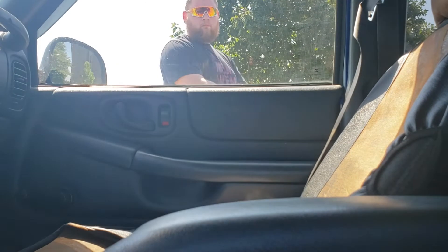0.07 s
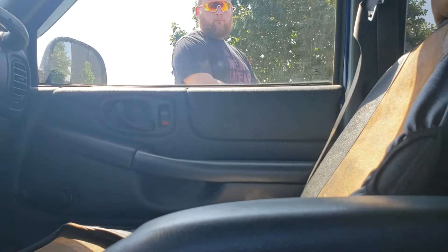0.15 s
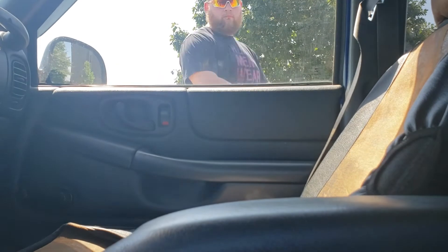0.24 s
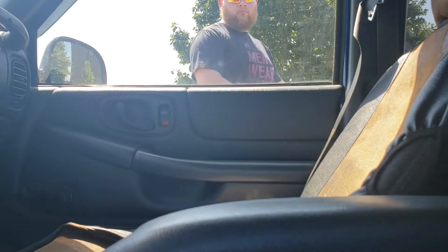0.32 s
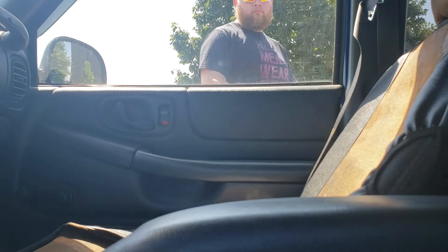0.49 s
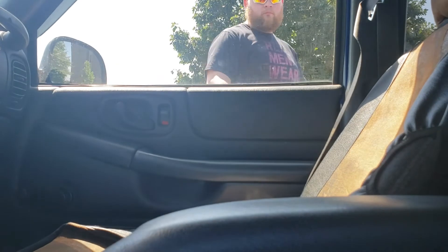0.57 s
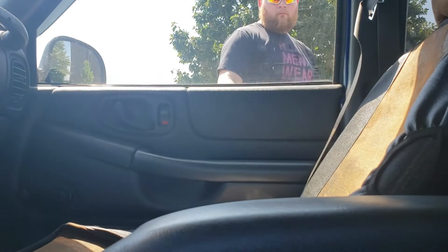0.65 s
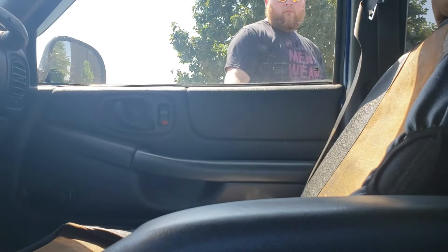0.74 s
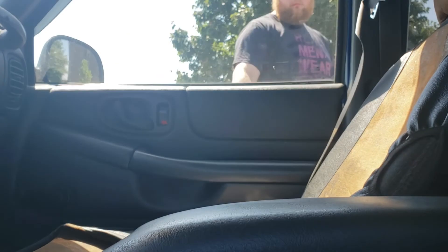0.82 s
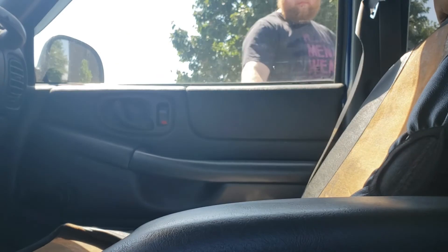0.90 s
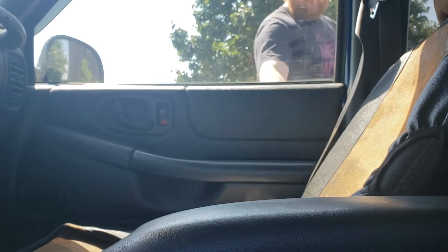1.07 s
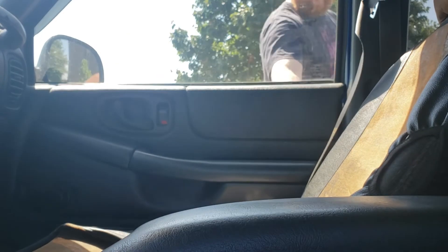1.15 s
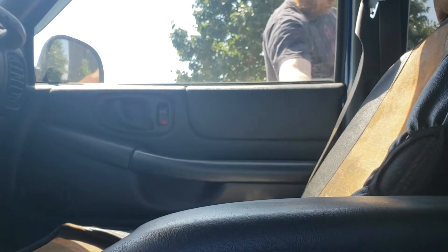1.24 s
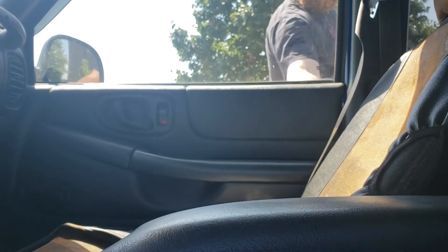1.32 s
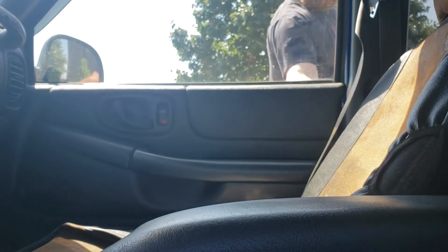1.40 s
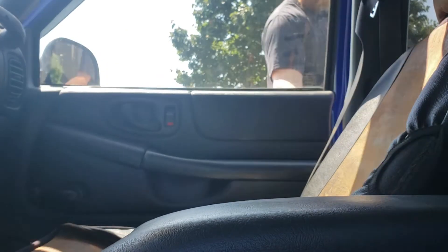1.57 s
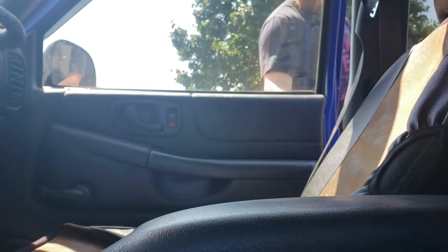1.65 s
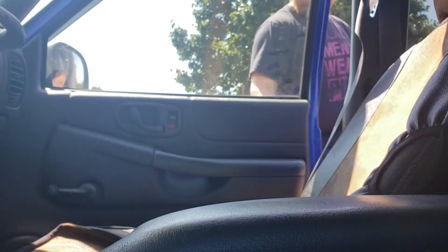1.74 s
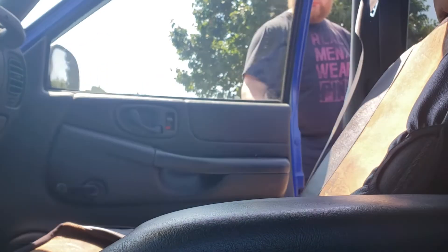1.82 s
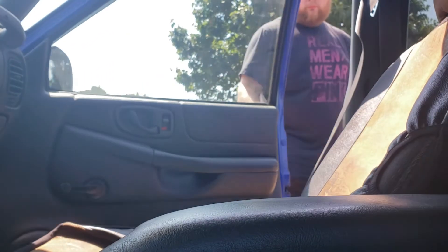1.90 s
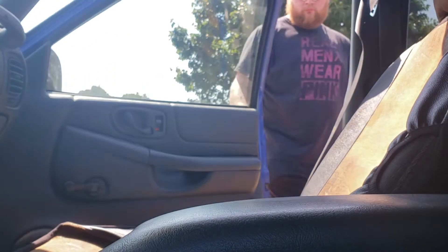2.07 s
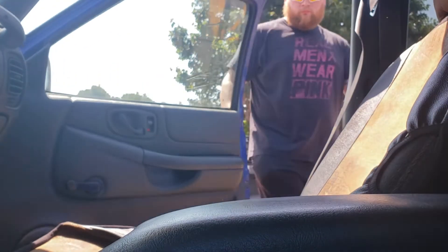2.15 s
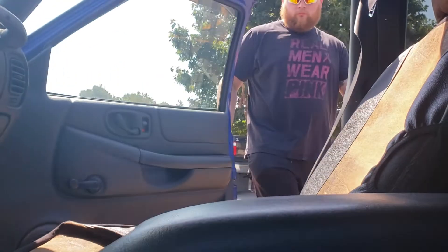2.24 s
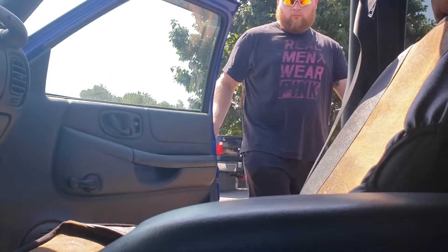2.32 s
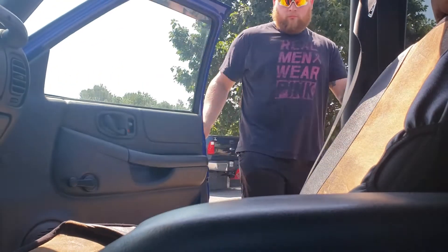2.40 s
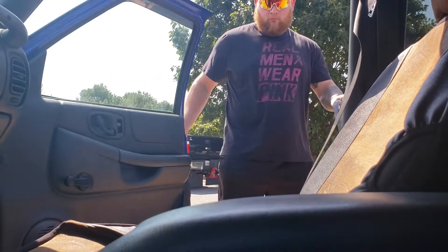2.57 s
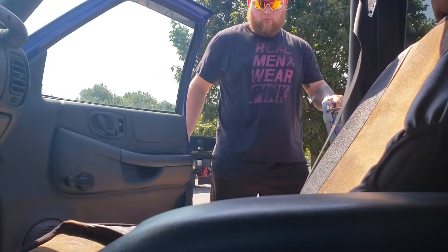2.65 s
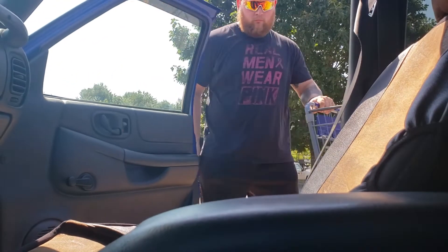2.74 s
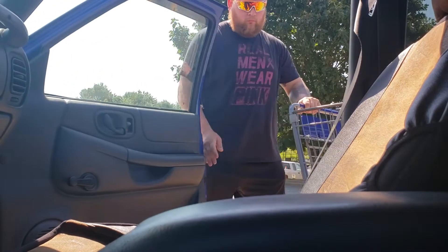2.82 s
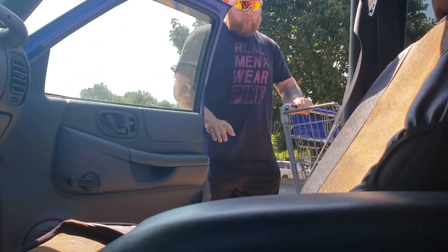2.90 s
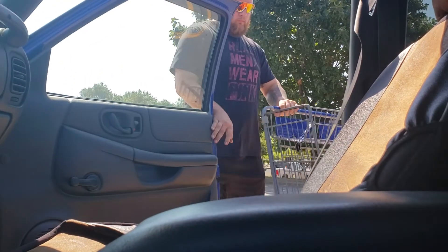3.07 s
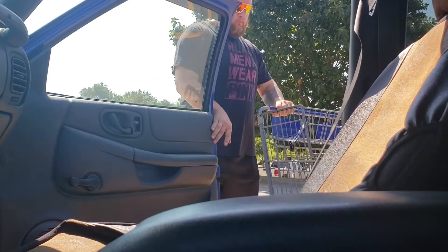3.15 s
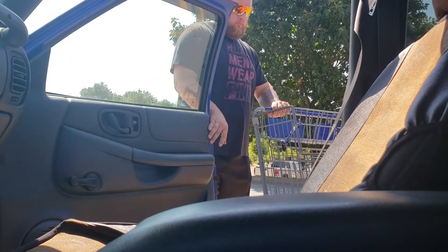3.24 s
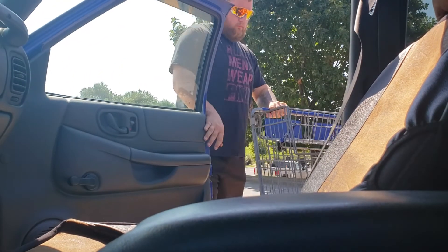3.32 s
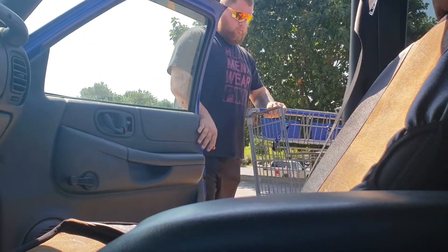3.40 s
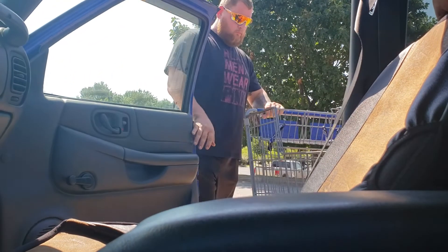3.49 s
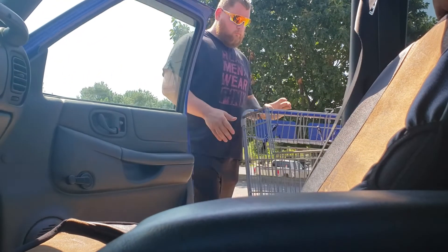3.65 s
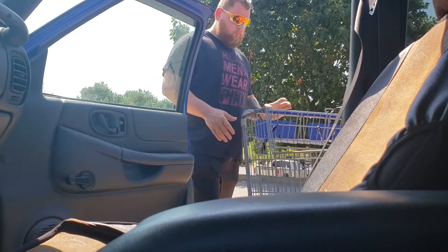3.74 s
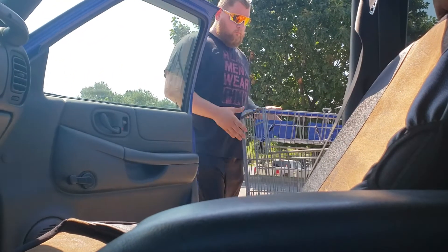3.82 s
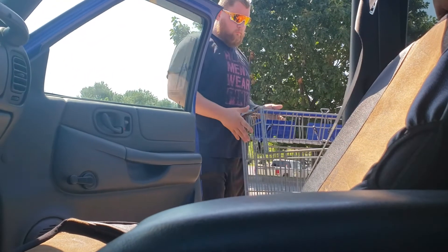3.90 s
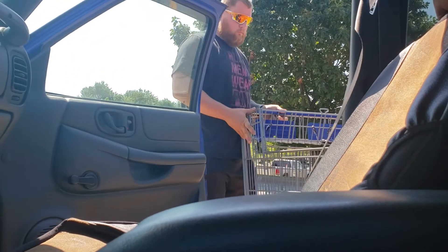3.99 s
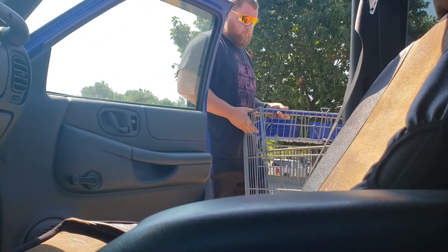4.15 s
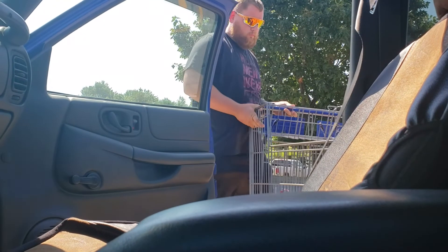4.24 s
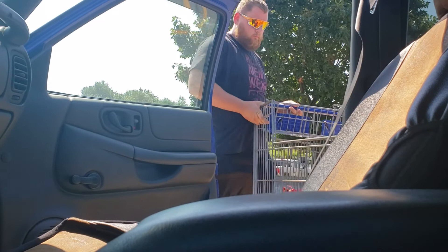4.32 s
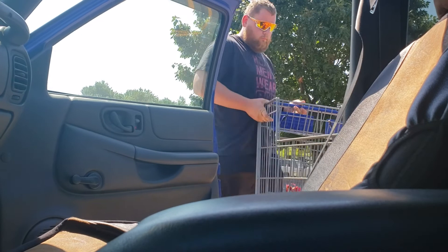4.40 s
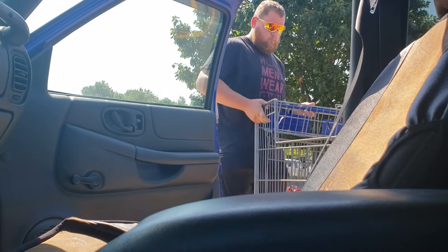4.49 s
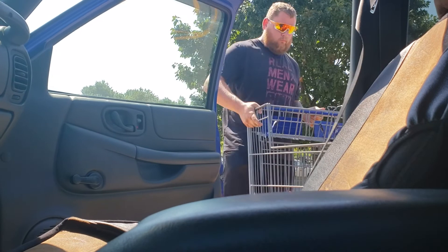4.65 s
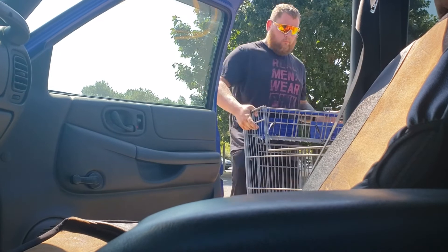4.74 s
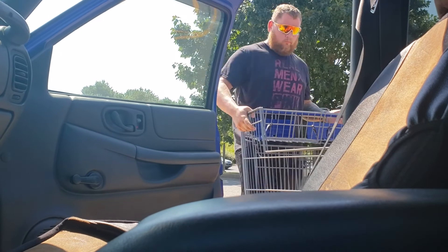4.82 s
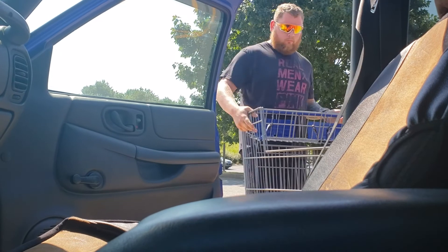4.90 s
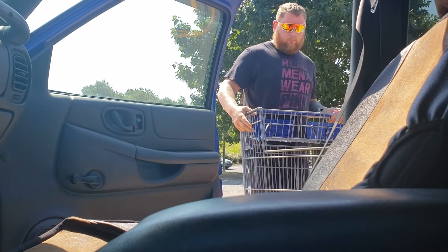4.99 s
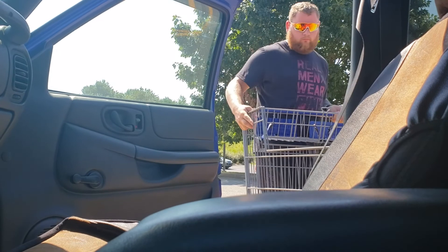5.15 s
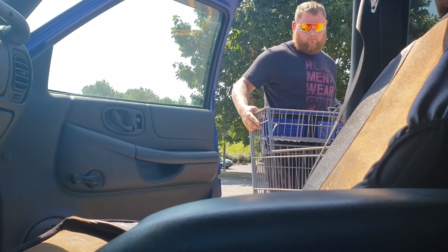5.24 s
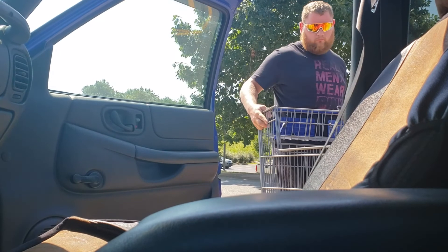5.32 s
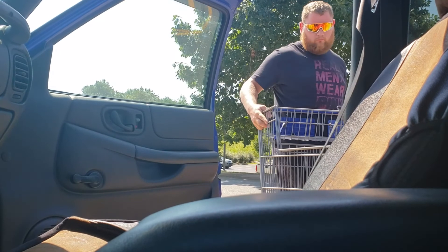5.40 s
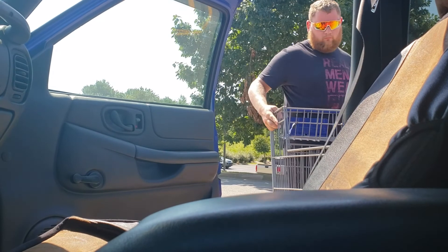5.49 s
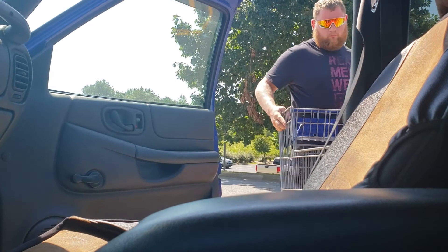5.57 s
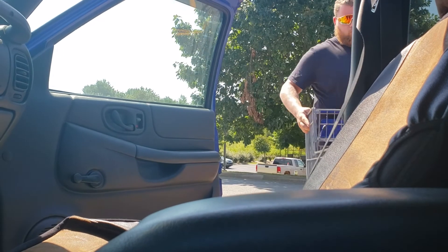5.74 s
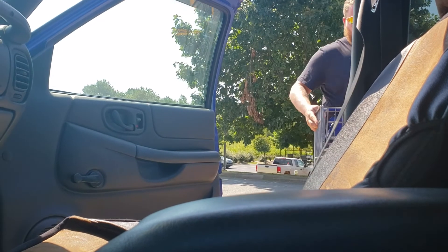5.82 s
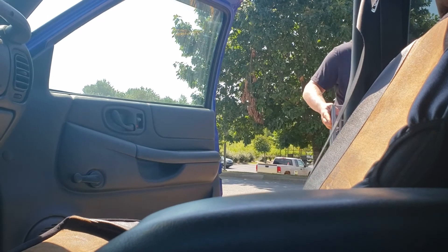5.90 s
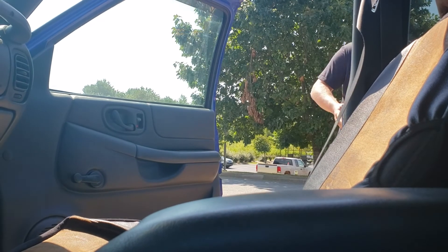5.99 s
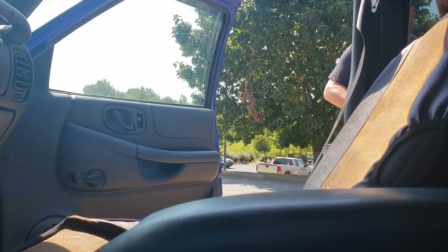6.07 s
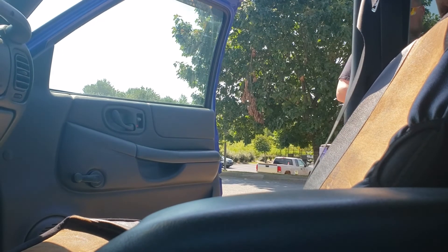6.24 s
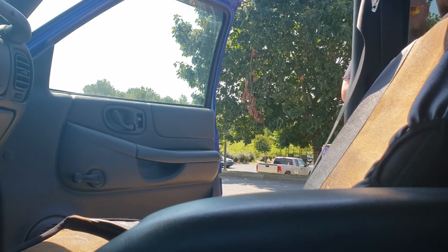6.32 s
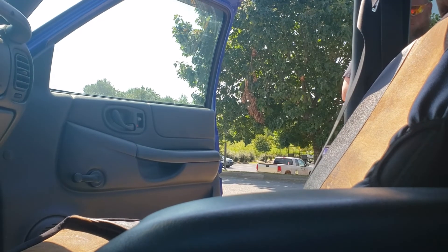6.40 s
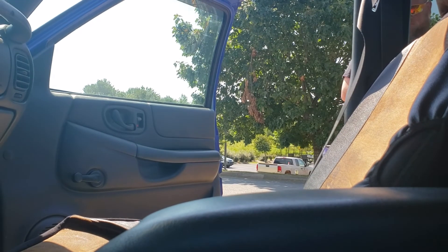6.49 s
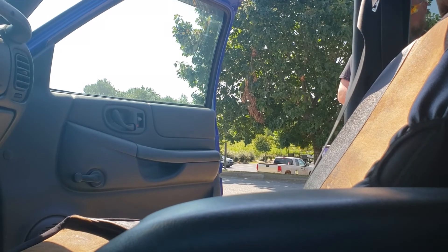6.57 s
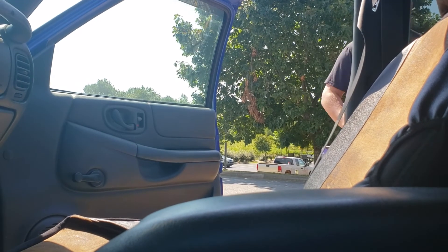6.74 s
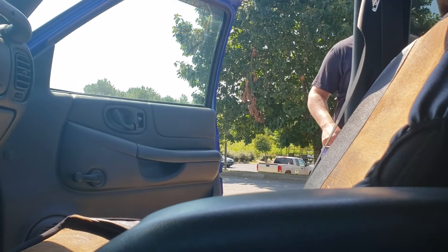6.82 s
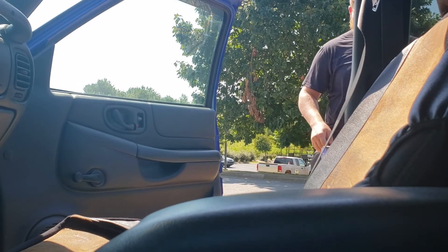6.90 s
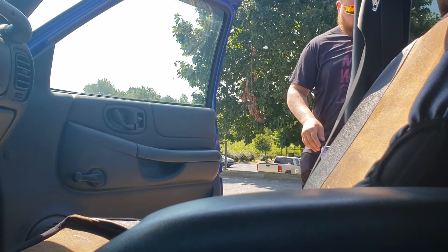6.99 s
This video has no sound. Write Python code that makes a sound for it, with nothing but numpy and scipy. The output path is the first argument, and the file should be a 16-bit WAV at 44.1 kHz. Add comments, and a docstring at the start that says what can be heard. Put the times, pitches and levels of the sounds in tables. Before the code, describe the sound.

A low, wavering engine rumble fills a truck cab. After a second the door pops open with a boomy thud and crisp metal clicks, followed by small knocks. The parking lot's faint wash enters. A cart is pushed in short bursts with hissing wheels, thin squeaks and jingling wires, ending in stronger rattles while the idle sinks slower. The stereo microphone sits inside, with short reflections from glass and trim.

```python
"""Inside a parked pickup with an unevenly idling engine: firing harmonics boom in the cab over a noisy shake.
The door is unlatched from outside with a thump and clicks: decaying modes, struck resonances and noise bursts.
It swings open and lets in the parking lot: coloured noise and the buzz of the engine bay.
A wire shopping cart is pushed in bursts: its wheels hiss, a caster squeaks, jolts rattle and ring the basket."""
import sys
import numpy as np
from scipy import signal
from scipy.fft import rfft, irfft
from scipy.io import wavfile
from scipy.ndimage import uniform_filter1d

SR = 44100
rng = np.random.default_rng(int(sys.argv[2]) if len(sys.argv) > 2 else 0)


def transcribe(u):
    """Save the signal u as a 16-bit wav file named by the first command-line argument.

    u: samples, shape (n,) or (channels, n), limited to [-1, 1]; the rate is SR.
    q: integer samples, one column per channel.
    """
    v = np.clip(np.atleast_2d(u).T, -1, 1)
    q = np.round(v * 32767).astype(np.int16)
    wavfile.write(sys.argv[1], SR, q)


N = 310976
T = np.arange(N) / SR

# In every table of resonances, width_hz is the bandwidth before ring() scales it by its damping.
# In every colour, level_db is the relative level per Hz.

# the idle hunts up and down: time_s, firing_rate_hz
IDLE_HUNT = [(0.0, 55.23), (0.3, 55.94), (0.82, 57.98), (1.05, 56.07), (1.28, 51.18), (1.6, 48.18),
             (1.82, 46.64), (2.4, 51.59), (3.1, 54.88), (3.35, 54.48), (3.6, 50.21), (3.95, 47.44),
             (4.45, 42.8), (5.0, 39.3), (5.5, 41.83), (6.15, 39.92), (7.05, 40.37)]
# jolts of the cart: start_s, level_db, brightness_db, t60_s
CART_JOLTS = [(4.781, -54, -7, 0.17), (4.797, -60, -14, 0.42), (4.818, -56, -2, 0.04),
              (5.296, -65, 0, 0.22), (5.324, -57.5, 5.5, 0.18), (5.339, -51.5, 7, 0.053),
              (5.438, -60, -5, 0.038), (5.776, -58, -1, 0.26), (5.796, -55.5, 1, 0.11),
              (5.92, -61, -7, 0.76), (6.082, -57.5, -9.5, 0.42), (6.309, -40.5, -3, 0.13),
              (6.332, -44.5, -7, 0.28), (6.376, -47.5, -5.5, 0.29), (6.407, -49, -9.5, 0.45),
              (6.461, -54, -1.5, 0.27), (6.540, -56.5, -10, 0.196), (6.658, -58, 1, 0.04)]


def door():
    """The latch lets go: the door booms on its seal, body and panel ring, steel parts clack and tick."""
    # pushes on the whole door: start_s, level_db
    thumps = [(1.3595, -25), (1.373, -17.5), (1.385, -24), (1.399, -13), (1.48, -35)]
    # slow modes of the door: pitch_hz, level_db beside the push, t60_s
    door_modes = [(74.7, 0.5, 0.16), (50, -10.5, 0.32), (125.4, -12.5, 0.57), (165.9, -17.5, 0.57),
                  (263, -25, 0.1)]
    # handle, latch, seal and hinge stop: start_s, level_db, brightness_db, t60_s
    door_hits = [(1.312, -60.5, -12, 0.25), (1.3605, -45, 9, 0.31), (1.370, -39.5, 9.5, 0.1),
                 (1.398, -36.5, 3, 0.075), (1.4035, -34.5, 7, 0.13), (1.461, -48, 14, 0.21),
                 (1.4825, -36, 21.5, 0.0059), (1.486, -56.5, 29, 0.069), (1.5055, -43.5, -1, 0.12),
                 (1.549, -53.5, 1, 0.26), (1.619, -55.5, 1, 0.12), (1.6315, -49.5, 20.5, 0.02),
                 (1.634, -53.5, 4, 0.094), (1.666, -64, -15, 1), (1.868, -58.5, 4, 0.21),
                 (2.470, -51, -3, 0.2), (2.484, -48.5, -14, .12), (2.628, -58, -8, 0.074),
                 (3.565, -55.5, -7, 0.055)]
    # share of a hit for hollow body, trim panel, latch steel, tick: level_db, slope (dB per dB of brightness)
    door_parts = [(6, -0.03), (2, 0), (-9.5, 0.36), (-18, 1)]
    # resonances of the hollow door body: pitch_hz, width_hz, level_db
    body_modes = [(287, 75, 6.5), (339, 62, 7), (433, 330, -15)]
    # resonances of the door panel: pitch_hz, width_hz, level_db
    panel_modes = [(496, 88, 0), (620, 89, -0.5), (720, 90, -4.5), (953, 97, -11.5), (1013, 46, -7),
                   (1450, 300, -18.5)]
    # the latch claw clacks as it springs open, later the hinge check clacks: start_s, level_db
    clacks = [(1.404, -39), (1.466, -46), (1.4835, -43.5), (1.506, -38), (1.5125, -44.5), (1.549, -45.5),
              (1.632, -52), (2.962, -56)]
    # resonances of these clacks: pitch_hz, width_hz, level_db
    clack_modes = [(720, 87, 9), (937, 100, 10.5), (1085, 110, 2), (1390, 100, 5), (2000, 120, -3),
                   (2800, 150, -12)]
    # colour of the latch steel: pitch_hz, level_db
    latch_colour = [(710, -25), (1200, -11), (1470, -7), (1800, -2.5), (2400, -5), (2910, -6), (3800, -10),
                    (4860, -15.5), (6810, -14), (9000, -27), (11700, -56)]
    # colour of the finest latch ticks: pitch_hz, level_db
    tick_colour = [(3530, -71), (6000, -8.5), (8500, -13), (9700, -6), (11300, 2), (14500, -4),
                   (16000, -1.5)]

    boom, t = np.zeros(N), T[:SR // 2]
    for s, db in thumps:
        start = int(s * SR)
        for hz, mode_db, t60 in door_modes:
            boom[start:start + len(t)] += undb(db + mode_db - 60 * t / t60) * np.sin(2 * np.pi * hz * t)

    hits = shared(door_hits, door_parts)
    body, panel, steel, tick = blows(hits, softness=0.0077)
    flex = undb(-0.5) * body * noise(likeness=0.97)
    hollow = ring(flex, body_modes, damping=1.5)
    panel_knock = ring(undb(-0.5) * panel * noise(likeness=0.16), panel_modes, damping=1.3)
    clack = ring(strikes(clacks, contact_db=22.0), clack_modes, damping=0.95)
    steel_noise = undb(1.5) * colour(steel * chatter(900, 1.0), latch_colour)

    snap = strikes([(s, tick_db) for s, *_, tick_db, t60 in hits], contact_db=10)
    fine_noise = tick * chatter(1500, 1.8, likeness=0.17)
    ticking = undb(1.0) * colour(snap + fine_noise, tick_colour)
    return boom + hollow + cab(panel_knock + clack + steel_noise, -2.2, t60=0.071) + ticking


def cart():
    """Wheels hiss on asphalt and set the wires jingling; jolts rattle the frame, wire basket and loose joints."""
    # the cart comes out from behind the door: time_s, treble_db
    shadow = [(1.3, -20.5), (1.9, -14), (2.7, -1.5), (3.4, -2), (4.5, 3), (6.2, 1)]
    # share of a jolt taken by frame, basket and loose joints: level_db, slope (dB per dB of brightness)
    cart_parts = [(-3, -0.5), (2, 0), (7, 1)]
    # the loudest single wires ticking: start_s, level_db before the mix
    loud_ticks = [(3.973, -56.5), (5.512, -54.5), (5.548, -52.5), (5.7454, -55.5), (5.898, -53),
                  (5.9437, -50), (6.018, -51), (6.133, -48), (6.199, -47), (6.45, -43.5), (6.5976, -50),
                  (6.7013, -50), (6.8309, -48.5)]
    # colour of the rolling wheels: pitch_hz, level_db
    wheel_colour = [(1100, -12), (1650, -9), (1920, 0), (2150, -8), (2450, 0), (2850, -7), (3500, -9),
                    (4500, -13), (6500, -17)]
    # the swivelling wheels scrub brighter than they roll: pitch_hz, level_db
    scrub_colour = [(2200, -18), (2900, 1), (3500, -4), (4400, -4.5), (6000, -13.5)]
    # colour of the rattling wires: pitch_hz, level_db
    wire_colour = [(500, -11), (900, -11), (1250, -9), (1910, -4.5), (2520, -4), (3970, -2.5), (5030, -8.5),
                   (7000, -20), (9000, -30.5), (11700, -73.5)]
    # resonances of the wire basket: pitch_hz, width_hz, level_db
    basket_modes = [(1568, 85.2, 8), (1867, 110, 6.5), (2620, 60, -1), (2830, 90, 4), (3185, 63, 4.5),
                    (3890, 87, -3)]
    # the hinged gate of the basket clanks: start_s, level_db, t60_s
    clanks = [(4.782, -47, 0.08), (6.759, -59.5, 0.18), (6.853, -64, 0.21)]
    # resonances of the gate: pitch_hz, width_hz, level_db
    gate_modes = [(1490, 180, -4), (1910, 120, 1.5), (2130, 140, -0.5), (2400, 200, -13), (2700, 180, -7.5)]
    # colour of the shaken frame: pitch_hz, level_db
    frame_colour = [(170, -35), (270, 4.5), (330, 6.5), (394, -1), (580, 5), (898, 0.5), (1500, -5.5),
                    (1950, -29), (3300, -120)]
    # colour of the jingling joints: pitch_hz, level_db
    jingle_colour = [(2940, -24), (5000, -12), (7240, -2.5), (8400, -12), (9400, -6), (11100, 1),
                     (12200, 1), (15200, -1), (16000, -3)]
    # short wires ring on after each contact: pitch_hz, width_hz, level_db
    short_wire_modes = [(9750, 120, 0.5), (11800, 100, 6), (12400, 120, 2.5)]
    # single wires, struck hard, ring out: start_s, pitch_hz, level_db before the cab, t60_s
    clangs = [(4.116, 1950, -57, 0.058), (4.786, 1837, -43, 0.067), (4.878, 6000, -57, 0.067),
              (5.341, 3257, -42, 0.075), (5.343, 1837, -51, .1), (5.789, 3250, -53, .11),
              (6.338, 3100, -38, 0.066), (6.347, 2590, -31.5, .05), (6.377, 2000, -37, .05),
              (6.400, 11730, -36, 0.06), (6.408, 2090, -41.5, .06), (6.411, 12400, -34, 0.065)]
    # jingle level at the reference wheel hiss, and its rise in dB per dB of hiss
    reference_jingle_db, reference_hiss_db, jingle_slope = -60.5, -57, 0.6
    tick_t60_s = 0.072

    wheels_db, (shadow_db,) = roll(), curves(shadow)
    jingle_db = reference_jingle_db + jingle_slope * (wheels_db - reference_hiss_db) + shadow_db
    frame, basket, joint_hits = blows(shared(CART_JOLTS, cart_parts), softness=0.012)
    all_ticks = loud_ticks + stray_ticks(jingle_db)
    tick, = blows([(s, db, tick_t60_s) for s, db in all_ticks], softness=0.024)

    rolling_level = undb(wheels_db + 0.26 * shadow_db + 0.93 * walk(14))
    rolling = colour(rolling_level * chatter(150, 1.0, likeness=0.091), wheel_colour)
    swivel_db = 3 * walk(11)
    scrub_level = undb(wheels_db - 3.0 + shadow_db + swivel_db)
    scrub = colour(scrub_level * chatter(200, 2.8, likeness=0.15), scrub_colour)

    contacts = basket * undb(walk(120)) + undb(-16.0) * tick
    wires = undb(-2.5) * colour(contacts * chatter(400, 2.0, likeness=0.26), wire_colour)
    basket_ring = undb(-5.5) * ring(contacts * chatter(300, 3.9), basket_modes, damping=0.67)
    gate_noise = undb(0.5) * blows(clanks, softness=0.022) * noise()
    gate = ring(gate_noise + strikes(clanks, contact_db=23.0), gate_modes, damping=0.89)
    frame_rattle = colour(frame * noise(likeness=0.38), frame_colour)
    rattle = frame_rattle + wires + basket_ring + gate + pings(stray_clinks(basket))

    joints = joint_hits * chatter(450, 1.9, likeness=0.12)
    joints = joints + undb(-2.5) * tick * noise(likeness=0.16)
    joints = joints + undb(jingle_db) * chatter(220, 3.0, likeness=0.07)
    jangle = undb(4) * colour(joints, jingle_colour)
    short_contacts = (joint_hits + undb(jingle_db)) * chatter(40, 3.5, likeness=0.2)
    short_wires = undb(-7) * ring(short_contacts, short_wire_modes, damping=0.9)
    return rolling + scrub + cab(rattle + pings(clangs), -1) + jangle + short_wires


def roll():
    """Wheel hiss in dB: each push gathers speed, then coasts out at a steady loss down to a creep."""
    # pushes on the cart: start_s, gather_s (time to gather speed), length_s (until it coasts),
    # level_db (wheel hiss before shadow and flicker)
    pushes = [(1.81, 0.53, 1.39, -63), (3.432, 0.41, 0.39, -71), (4.641, 0.12, 0.11, -64),
              (5.297, 0.069, 0.081, -71), (5.891, 0.05, 0.57, -64.5), (6.626, 0.19, 0.16, -72)]
    coast_db_per_s, creep_db = 56, -85.5
    hiss = undb(creep_db)
    for s, gather_s, length_s, db in pushes:
        coasting_s = np.maximum(T - s - length_s, 0)
        gathering = np.clip((T - s) / gather_s, 0, 1)
        hiss = np.maximum(hiss, gathering * undb(db - coast_db_per_s * coasting_s))
    return 20 * np.log10(hiss)


def stray_ticks(jingle_db, count=80):
    """Rows (start_s, level_db) of wires that tick by chance, louder when the cart jingles more."""
    ticks_per_s, over_jingle_db, scatter_db = 7.3, 8, 7  # the rate is nominal: the gaps vary
    gap, size = rng.standard_normal((count, 2)).T
    times = np.cumsum(np.exp(0.5 * gap)) / ticks_per_s
    sizes = np.clip(size, -2, 2)
    return [(s, jingle_db[int(s * SR)] + over_jingle_db + scatter_db * z)
            for s, z in zip(times, sizes) if s < T[-1]]


def stray_clinks(shaking, count=1400):
    """Rows (start_s, pitch_hz, level_db, t60_s) of wires knocking at chance pitches while the basket shakes."""
    low_hz, high_hz, t60_s = 1500, 3900, 0.04
    beside_jolt_db, scatter_db = -3, 3
    when, pitch, size = rng.random((count, 3)).T
    shaking_db = 20 * np.log10(shaking[(when * (N - 1)).astype(int)] + 1e-9)
    # many weak clinks, a few strong ones
    db = shaking_db + beside_jolt_db + scatter_db * np.minimum(-np.log(1 - size) - 1, 2)
    hz = low_hz * (high_hz / low_hz) ** pitch
    return [(s, f, d, t60_s) for s, f, d in zip(when * T[-1], hz, db) if d > -78]  # skip the faintest


def mesh(count=80):
    """Each jolt strikes the welded mesh at another spot, so its close modes ring in a new mix every time."""
    low_hz, high_hz, t60_s = 1000, 4800, 0.11
    beside_jolt_db, slope = -2.5, 0.14  # slope: dB per dB of the jolt's brightness
    out, t = np.zeros((2, N + SR)), T[:SR // 6]
    hz = low_hz * (high_hz / low_hz) ** ((np.arange(count) + rng.random(count)) / count)
    modes = np.sin(2 * np.pi * np.outer(hz, t)) * undb(-60 * t / t60_s) * np.sqrt(2 / count)
    mixes = rng.standard_normal((len(CART_JOLTS), 3, count))
    for (s, db, bright_db, _), mix in zip(CART_JOLTS, mixes):
        start = int(s * SR)
        port_mix = (mix[0] + mix[1:]) / np.sqrt(2)  # half common to both ports, half their own
        out[:, start:start + len(t)] += undb(db + beside_jolt_db + slope * bright_db) * port_mix @ modes
    return out[:, :N]


def caster():
    """A dry swivel slips in short ringing chirps and now and then snaps round."""
    # chirps of the dry caster: start_s, level_db
    squeaks = [(3.315, -68), (3.632, -65.5), (3.691, -64.5), (3.717, -59.5), (3.747, -60), (3.799, -53.5),
               (3.858, -56.5), (4.968, -63)]
    # resonances of the caster: pitch_hz, width_hz, level_db
    caster_modes = [(3100, 52, -2), (3340, 75, 3.5), (3860, 89, 5.5), (4560, 110, -8), (5530, 110, -7)]
    # the swivel snaps round: start_s, level_db, t60_s
    snaps = [(2.829, -54, 0.06), (3.799, -49, 0.079)]
    # colour of a snap: pitch_hz, level_db
    snap_colour = [(2700, -12), (3400, 2), (4100, -12), (4600, -4.5), (5650, -10), (6200, -15)]
    squeak_t60_s = 0.11
    squeak_shape = blows([(s, db, squeak_t60_s) for s, db in squeaks], softness=0.03)
    slips = undb(-6) * squeak_shape * noise() + strikes(squeaks, contact_db=24)
    chirps = ring(slips, caster_modes, damping=0.7)
    snapping = colour(blows(snaps) * chatter(600, 1.9), snap_colour)
    return cab(chirps + snapping, -2)


def engine():
    """Firing harmonics glide through the cab's resonances and boom as the engine slows; combustion shakes the cab."""
    # harmonics, first to fourth: level_db, slowing_db (extra as the engine slows), open_db (extra, door open)
    harmonics = [(-44.5, 1.5, 1.5), (-54, 14.5, 3), (-59.5, 1.5, 2.5), (-60.5, -16.5, -12.5)]
    # how the cab booms at each frequency: pitch_hz, gain_db
    cab_boom = [(39, -1), (46, 1.5), (51, 1.5), (57, -3), (78, -4.5), (86, -20), (94, -4.5), (103, 1.5),
                (115, 1.5), (138, -7.5), (155, 3), (166, 4.5), (200, 7.5), (226, 3.5)]
    # colour of the shaking cab: pitch_hz, level_db
    rumble_colour = [(19, -38), (30, -17), (37, -9), (48, 0), (76, -7), (102, -7.5), (120, -10),
                     (140, -38.5), (199, -17.5), (213, -18), (226, -51), (240, -41.5), (310, -52.5),
                     (530, -120)]
    # shaking of the cab: time_s, level_db before the puffs pulse it
    shake_level = [(0, -50), (1.2, -44), (1.7, -45.5), (3.2, -46), (3.9, -40), (5.2, -47), (7.05, -43.5)]
    # fall in firing rate that gives the full boom, and the time over which the boom is smoothed
    full_slowing_hz_per_s, boom_smoothing_s = 2.95, 0.26

    hz, = curves(IDLE_HUNT)
    slowing = np.clip(-np.gradient(hz) * SR / full_slowing_hz_per_s, 0, 1)
    slowing = uniform_filter1d(slowing, int(boom_smoothing_s * SR))
    phase = 2 * np.pi * np.cumsum(hz * (1 + 0.0026 * walk(16))) / SR
    boom_hz, boom_db = np.transpose(cab_boom)
    tone = 0
    for k, (db, slowing_db, open_db) in enumerate(harmonics, 1):
        cab_db = np.interp(np.log(k * hz), np.log(boom_hz), boom_db)
        level_db = db + slowing_db * slowing + open_db * opening() + cab_db
        tone = tone + np.sqrt(2) * undb(level_db + 1.3 * walk(11)) * np.cos(k * phase)
    puffs = noise(likeness=0.99) * (1 + np.cos(phase))  # noise swelling once per firing
    shake = colour(puffs, rumble_colour) * undb(curves(shake_level)[0])
    return tone + shake


def parking_lot():
    """Faint air in the shut cab; the open door lets in traffic, high hiss and the buzz and rush of the engine bay."""
    # colour of the air in the shut cab: pitch_hz, level_db
    air_colour = [(170, -1.5), (240, -21.5), (320, -17), (450, -36.5), (600, -56.5), (1500, -64),
                  (5000, -77), (14000, -53.5)]
    # colour of engine bay and traffic: pitch_hz, level_db
    lot_colour = [(150, -54.5), (250, -20.5), (296, 1.5), (549, -13.5), (923, -17.5), (1850, -29),
                  (2250, -38), (4000, -35), (4500, -29), (5850, -62), (9900, -120)]
    # colour of the high hiss outside: pitch_hz, level_db
    hiss_colour = [(2350, -56), (4000, -20), (4490, -7), (6240, 3), (7080, 4.5), (7620, 1.5), (8780, -17),
                   (10000, -18.5), (13000, -67), (22000, -120)]
    # resonances of the engine bay, strongest at fast idle: pitch_hz, width_hz, level_db
    bay_modes = [(200, 20, 0), (305, 26, -2), (360, 34, 2)]
    mid_idle_hz = 50.47
    # levels with the door open at the middling firing rate, and their rise with the rate
    lot_db, lot_db_per_hz = -61, 0.36
    bay_db, bay_db_per_hz, buzz_db = -64, 0.78, -2  # firing buzz beside the rush of air
    hiss_db = -71
    shut_lot_db, shut_hiss_db = -18, -35  # what gets through the shut door

    hz, gap = curves(IDLE_HUNT)[0], opening()
    above_hz = hz - mid_idle_hz
    lot_in, hiss_in = (undb(db) + (1 - undb(db)) * gap for db in (shut_lot_db, shut_hiss_db))
    air = undb(-58.5) * colour(noise(likeness=1.0), air_colour)
    lot_level = undb(lot_db + lot_db_per_hz * above_hz + 1.0 * walk(8.9))
    lot = lot_in * lot_level * colour(noise(likeness=0.88), lot_colour)
    firings = np.diff(np.floor(np.cumsum(hz) / SR), prepend=0)  # one impulse per firing
    drone = ring(noise(likeness=0.9) + undb(buzz_db) * firings / firings.std(), bay_modes, damping=0.8)
    bay = gap * undb(bay_db + bay_db_per_hz * above_hz + 1.4 * walk(2.8)) * drone
    hiss = hiss_in * undb(hiss_db + 0.5 * walk(24)) * colour(noise(likeness=0.065), hiss_colour)
    return air + bay + cab(lot, 0.27) + hiss


def opening():
    """How far the door stands open, 0 to 1."""
    opens_s, swing_s = 1.2, 1
    return np.clip((T - opens_s) / swing_s, 0, 1)


def cab(x, wet_db, t60=0.048, apart_hz=400):
    """Each port has its own reflections from glass and trim, except in the bass; they colour only mildly."""
    t, out = T[:SR // 8], []
    treble_only = signal.butter(2, apart_hz, "high", fs=SR, output="sos")
    for port in x:
        echoes = signal.sosfilt(treble_only, rng.standard_normal(len(t))) * undb(-60 * t / t60)
        response = undb(wet_db) * echoes / np.linalg.norm(echoes)
        response[0] += 1  # direct sound
        spectrum = rfft(response, 2 * len(t))
        mild = spectrum / np.sqrt(np.abs(spectrum))  # halves the peaks and dips in dB
        out.append(through(port, irfft(mild)[:len(t)]))
    return np.vstack(out)


def shared(hits, parts):
    """Share each hit among the parts of an object, each with its own slope against the hit's brightness."""
    return [(s, *(db + part_db + slope * bright_db for part_db, slope in parts), t60)
            for s, db, bright_db, t60 in hits]


def strikes(rows, contact_db=26):
    """One sharp impulse for each row (start_s, level_db, ..), raised by contact_db."""
    x = np.zeros(N)
    for s, db, *_ in rows:
        x[int(s * SR)] = undb(db + contact_db)
    return x


def blows(rows, softness=0.017):
    """One envelope per level column of rows (start_s, level_db, .., t60_s); longer blows also rise more slowly."""
    power, t = np.zeros((len(rows[0]) - 2, N + SR)), T[:SR // 2]
    for s, *db, t60 in rows:
        rise = softness * t60
        shape = np.minimum(t / rise, 1) * undb(-60 * np.maximum(t - rise, 0) / t60)
        start = int(s * SR)
        power[:, start:start + len(t)] += np.outer(undb(db), shape) ** 2
    return np.sqrt(power[:, :N])


def pings(rows):
    """Each row (start_s, pitch_hz, level_db, t60_s) rings one wire, which reaches the two ports out of step."""
    out, t = np.zeros((2, N + SR)), T[:SR // 10]
    for (s, hz, db, t60), apart in zip(rows, rng.uniform(-1.16, 1, len(rows))):
        start = int(s * SR)
        phase = 2 * np.pi * hz * t + np.array([[apart], [-apart]])
        out[:, start:start + len(t)] += undb(db - 60 * t / t60) * np.sin(phase)
    return out[:, :N]


def ring(x, modes, damping):
    """A bank of decaying resonances; damping scales their widths."""
    t, response = T[:SR // 4], 0
    for k, (hz, width_hz, db) in enumerate(modes):
        decay = np.exp(-np.pi * width_hz * damping * t)
        # alternating signs between neighbouring modes
        response = response + (-1) ** k * undb(db) * width_hz * decay * np.sin(2 * np.pi * hz * t)
    return through(x, response)


def colour(x, points, size=4096):
    """Causal (minimum-phase) filter with the given spectrum and steep skirts."""
    hz, db = np.transpose(points)
    octave = np.log2(np.maximum(np.fft.rfftfreq(size, 1 / SR), 1))
    known = np.log2(hz)
    beyond = np.abs(octave - np.clip(octave, known[0], known[-1]))
    skirt_db = np.minimum(36 * beyond, 70)  # 36 dB per octave, at most 70 dB
    cepstrum = irfft(np.log(undb(np.interp(octave, known, db) - skirt_db)))
    cepstrum[1:size // 2] *= 2  # fold onto the causal half
    cepstrum[size // 2 + 1:] = 0
    return through(x, irfft(np.exp(rfft(cepstrum))))


def through(x, response):
    """Pass a sound through an impulse response scaled to unit energy."""
    unit = response[None] / np.linalg.norm(response)
    return signal.oaconvolve(np.atleast_2d(x), unit, axes=1)[:, :N]


def chatter(rate, spread_db, likeness=0.36):
    """Noise broken into tiny contacts of uneven strength; rms 1."""
    x = noise(likeness) * undb(spread_db * np.clip(walk(rate), -2.2, 2.2))
    return x / x.std()


def noise(likeness=0.76):
    """White noise at the two ports; likeness is the share of power they have in common."""
    common, *own = rng.standard_normal((3, N))
    share = np.clip(likeness, 0, 1)
    return np.sqrt(share) * common + np.sqrt(1 - share) * np.array(own)


def walk(rate):
    """Smooth random wandering with a spread near 1, from new random values at the given rate in Hz."""
    k = max(int(SR / rate), 2)
    steps = np.repeat(rng.standard_normal(N // k + 1), k)
    return 1.36 * uniform_filter1d(uniform_filter1d(steps, k), k)[:N]


def curves(rows):
    """Each column of a time table, at every sample."""
    s, *columns = np.transpose(rows)
    return [np.interp(T, s, c) for c in columns]


def undb(db):
    """Decibels to gain."""
    return 10 ** (np.asarray(db) / 20)


def scene():
    """Everything as heard from the seat; the sounds of truck and lot reach the right port a little later."""
    port_lag_s = 0.00022
    left, right = door() + engine() + parking_lot()
    truck = np.array([left, np.roll(right, int(port_lag_s * SR))])
    return truck + cart() + mesh() + caster()


def record(dry):
    """Two microphone ports colour the sound differently; it fades in and out and loses its top."""
    # the left port mostly hears more treble: pitch_hz, left_minus_right_db
    port_balance = [(100, 1.64), (600, 0.5), (900, 10), (1700, 9.5), (3500, 5.5), (7000, 4), (8500, 11),
                    (10000, 3.5), (12000, 0), (14500, 10.5)]
    top_hz, fade_s = 15950, 0.008
    hz, db = np.transpose(port_balance)
    balance_db = np.interp(np.log(np.fft.rfftfreq(N, 1 / SR) + 1), np.log(hz), db)
    fade = np.minimum(np.minimum(T, T[-1] - T) / fade_s, 1)
    ports = irfft(rfft(dry * fade) * undb(np.array([balance_db, -balance_db]) / 2), N)
    return signal.sosfilt(signal.ellip(10, 0.2, 70, top_hz, fs=SR, output="sos"), ports)


dry = scene()
out = record(dry)
transcribe(out)
```